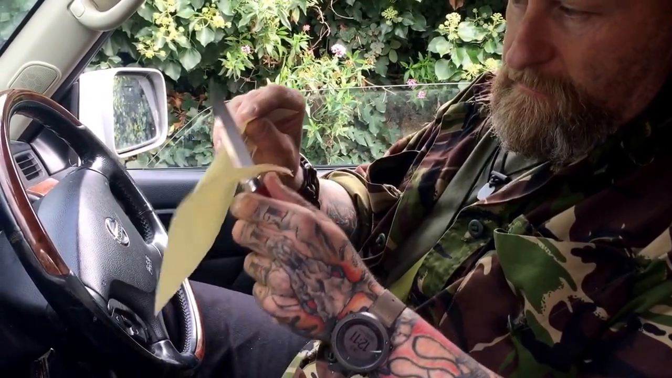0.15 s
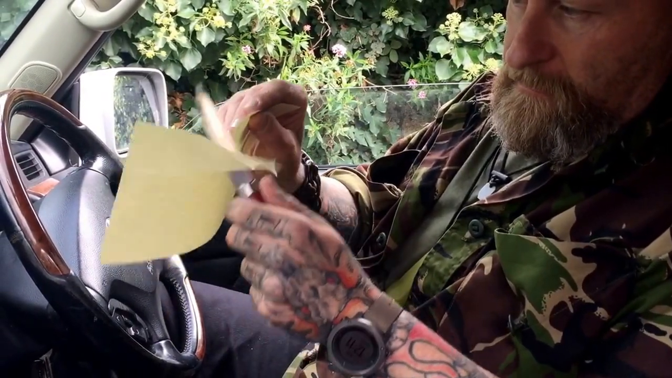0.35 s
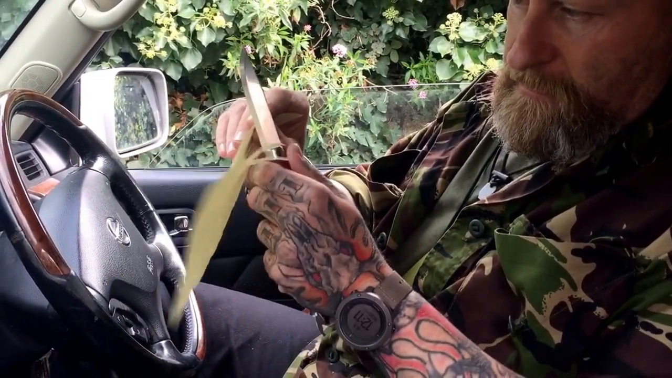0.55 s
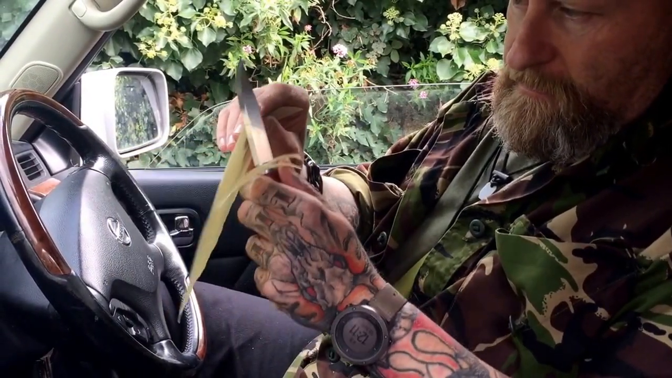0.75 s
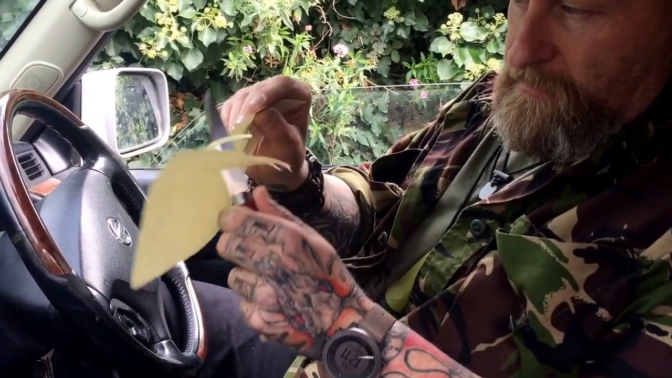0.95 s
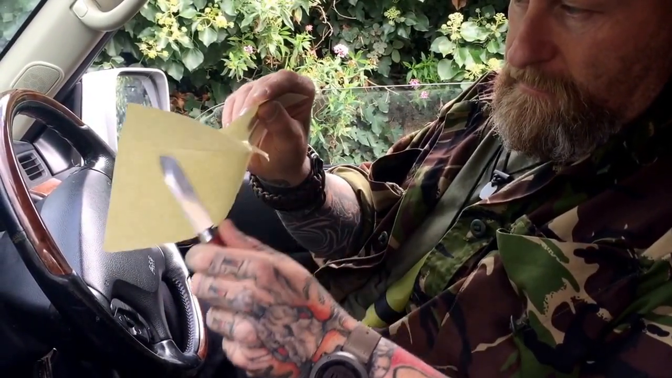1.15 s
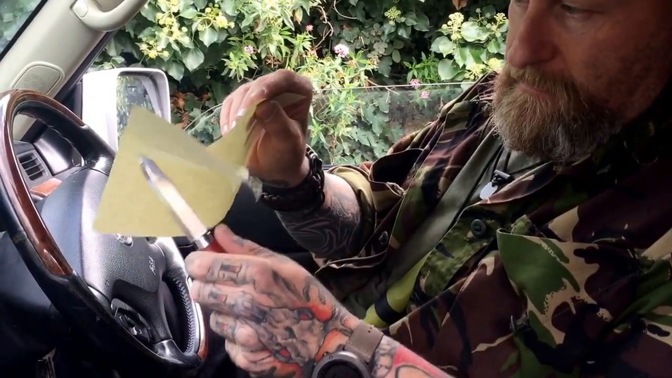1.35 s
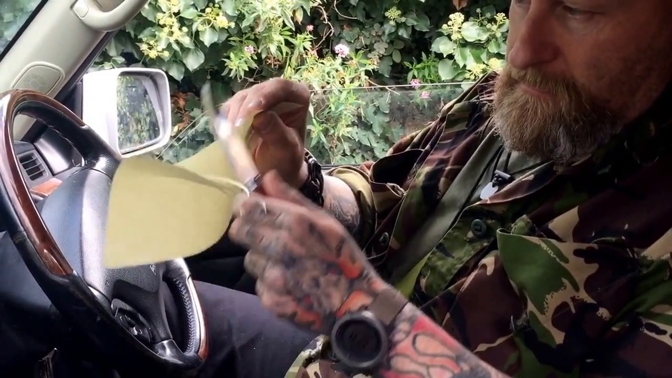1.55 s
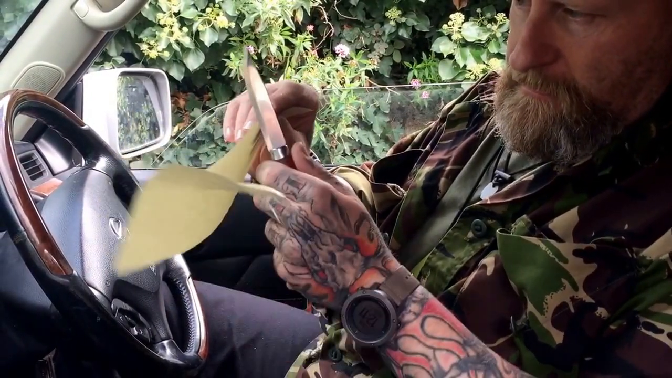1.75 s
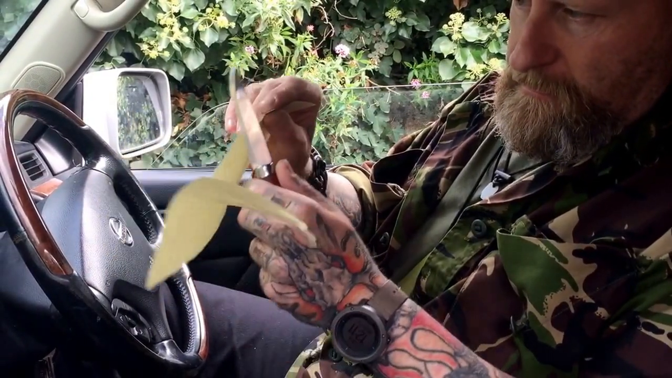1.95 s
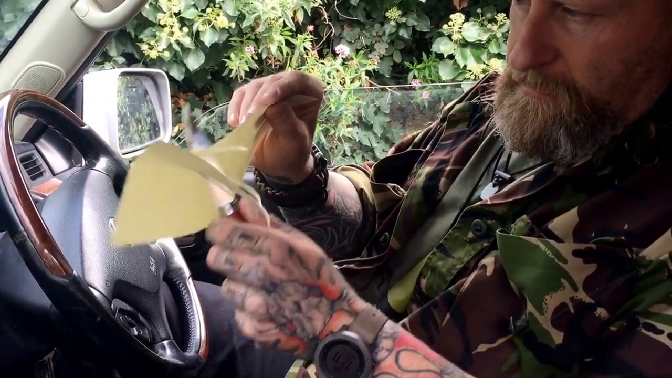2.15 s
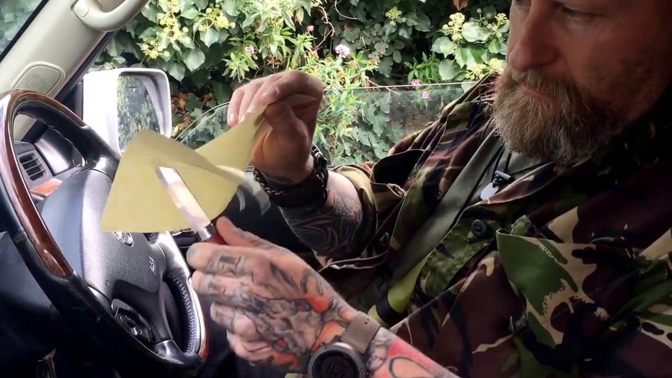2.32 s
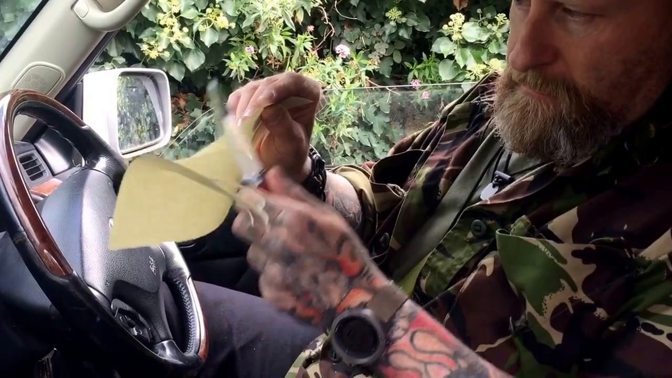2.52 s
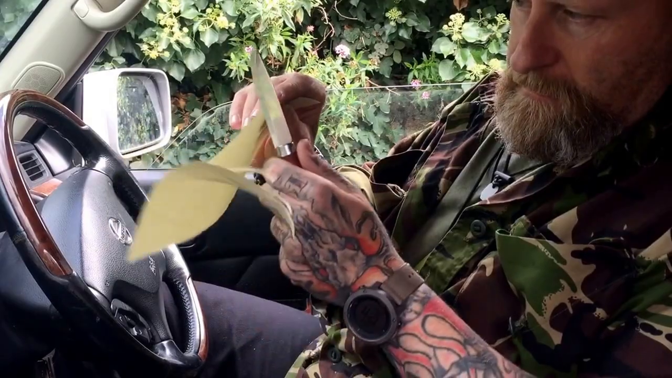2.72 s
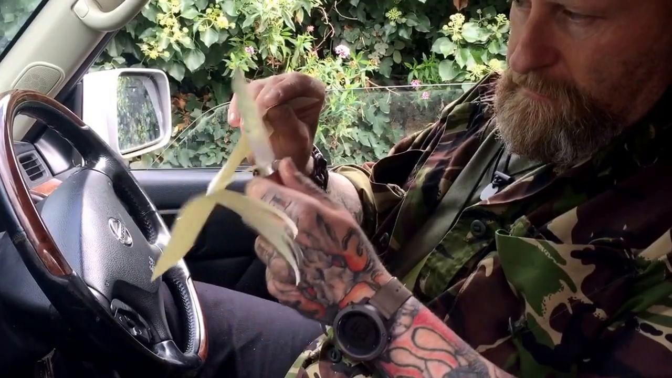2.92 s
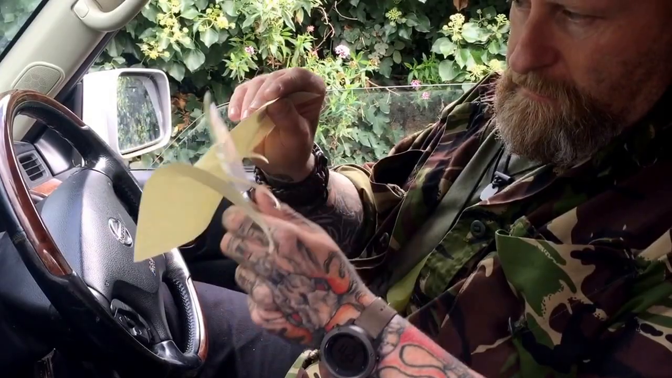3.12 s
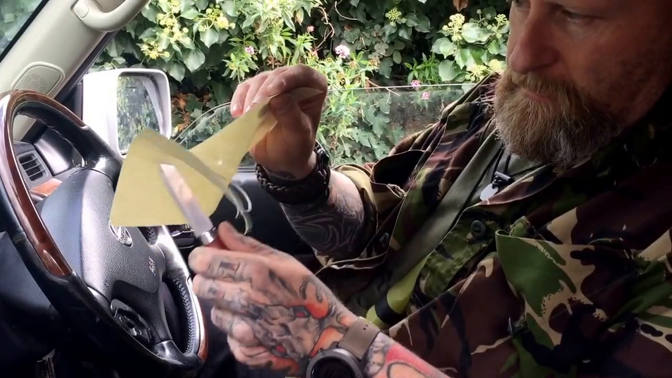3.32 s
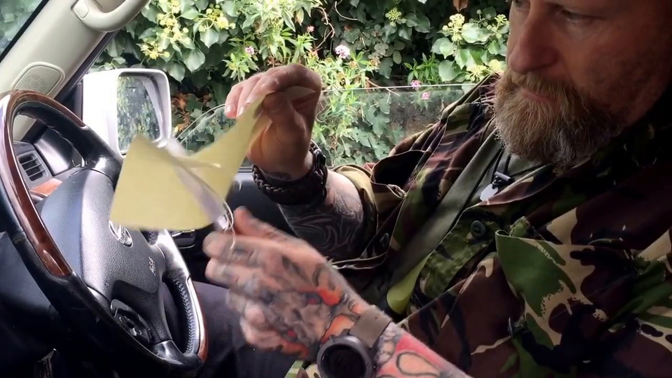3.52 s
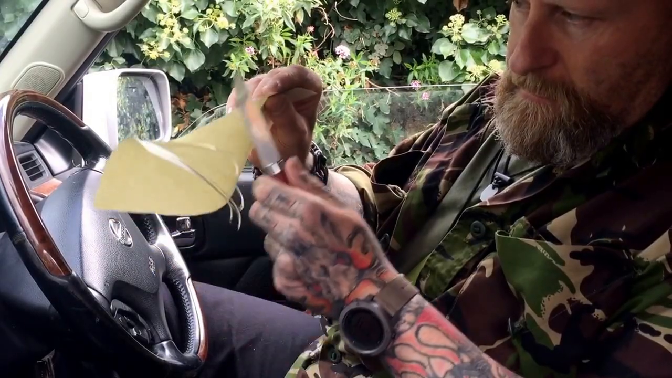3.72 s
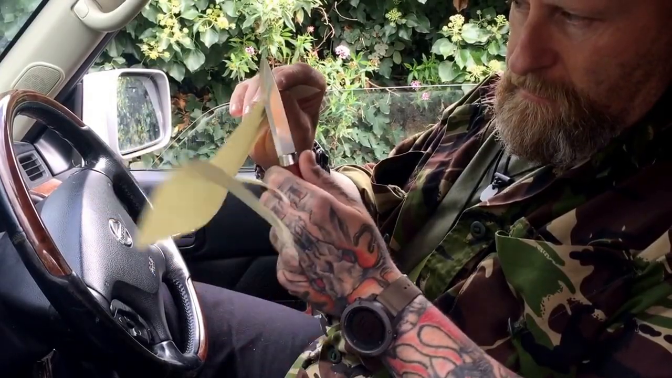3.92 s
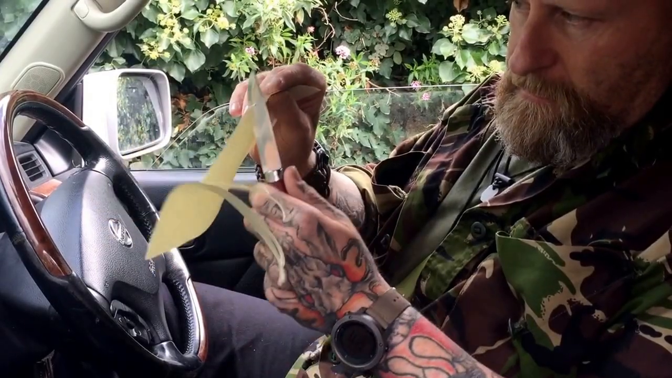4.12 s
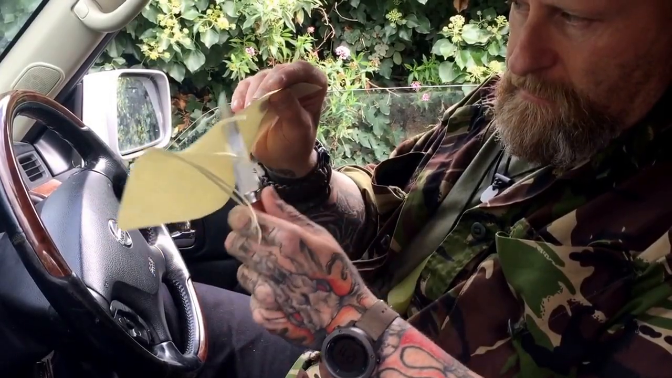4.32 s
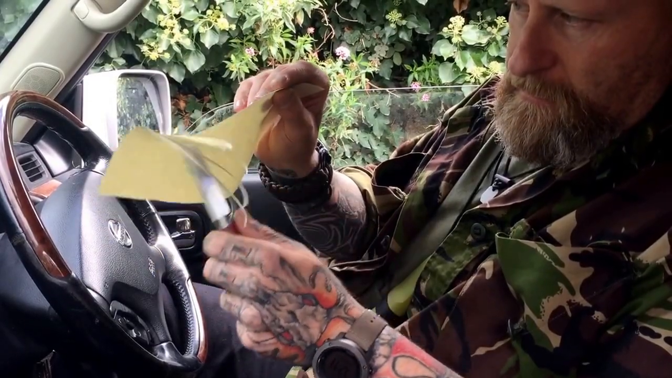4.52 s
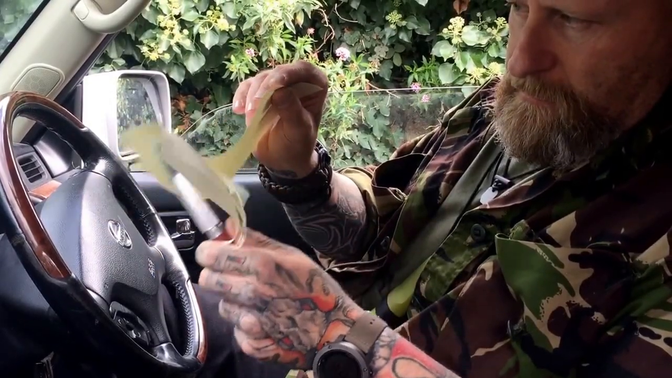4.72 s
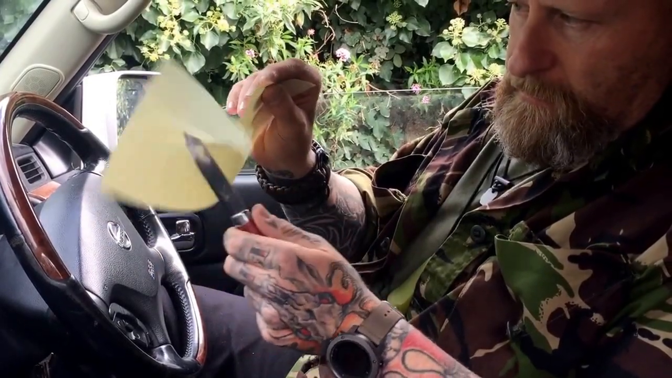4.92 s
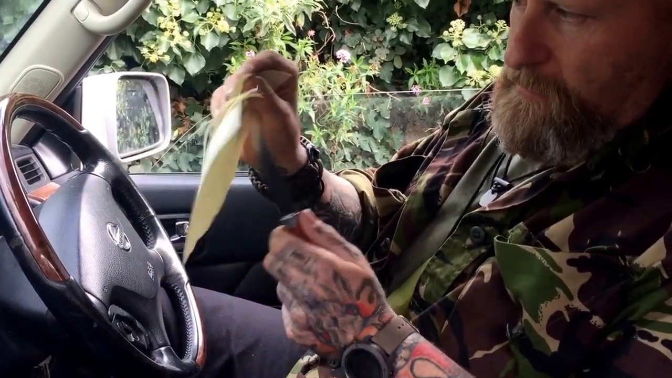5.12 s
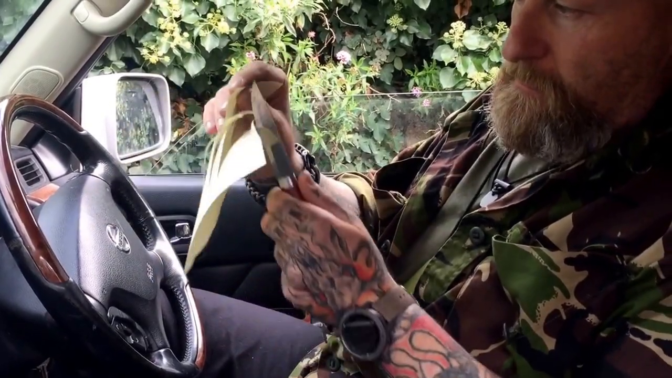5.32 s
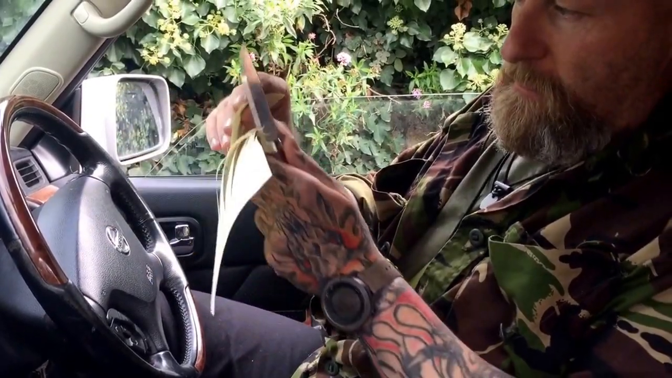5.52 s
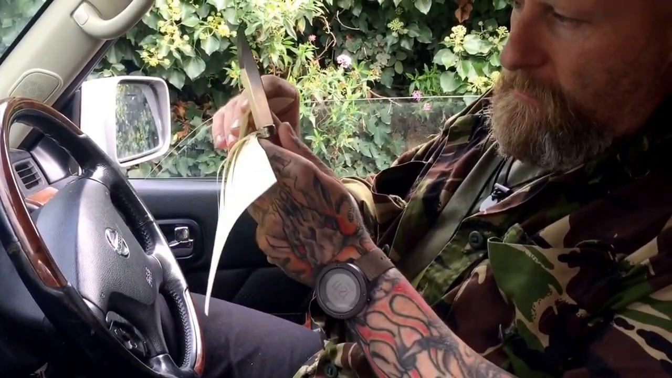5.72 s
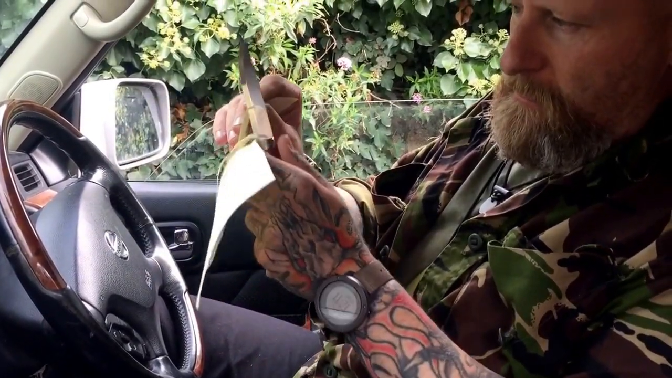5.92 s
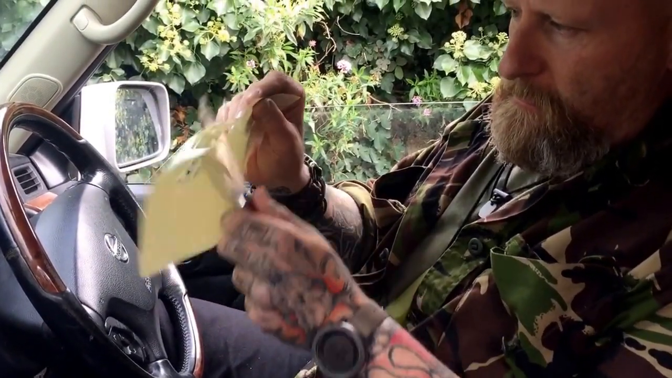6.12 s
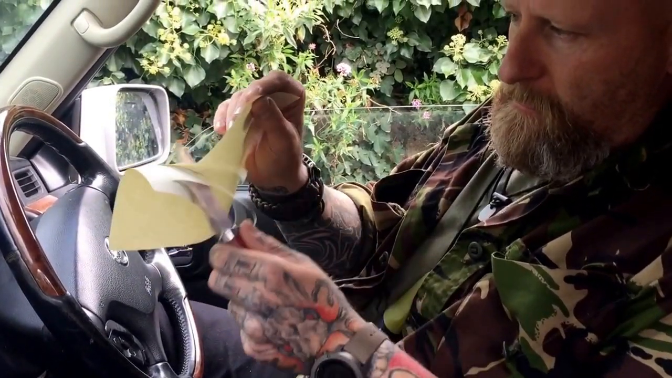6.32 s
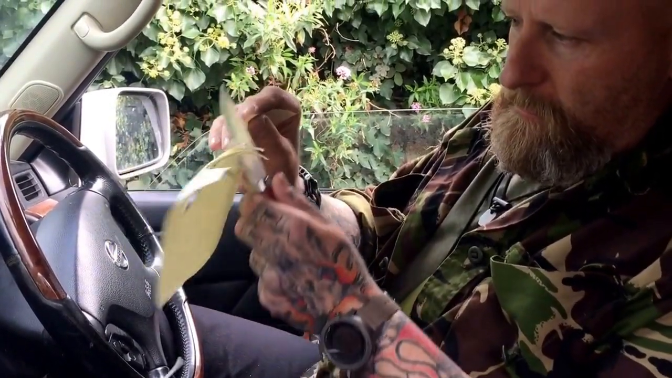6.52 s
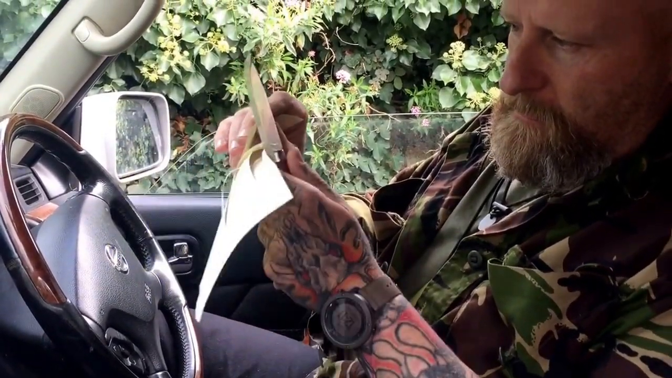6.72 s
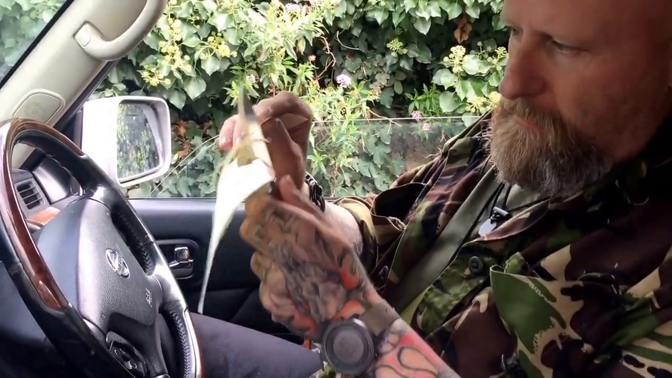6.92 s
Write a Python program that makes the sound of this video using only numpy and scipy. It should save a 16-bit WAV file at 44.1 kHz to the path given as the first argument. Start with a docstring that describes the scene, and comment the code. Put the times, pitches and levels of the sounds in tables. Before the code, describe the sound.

A sharp knife slices strips from a sheet of paper in hissing, rasping strokes, with small crackles between, inside a parked car.

```python
"""Inside a parked car, a sharp knife shaves strips off a hand-held sheet of paper.
Each cut starts as a thin hiss of snapping fibres and swells to a rasp as the sheet pulls taut and radiates.
Between cuts the blade grazes the edge and the loose sheet cracks, ticks, rustles and flops.
A faint, soft puff comes just before the first cut.
The small cabin colours all the paper but the flops; faint outdoor air comes through the shut doors."""
import sys
import numpy as np
from scipy import signal
from scipy.io import wavfile
from scipy.ndimage import uniform_filter1d, map_coordinates

SR = 44100
rng = np.random.default_rng(int(sys.argv[2]) if len(sys.argv) > 2 else 0)


def persist_wave(psi):
    """Save psi, clipped to +-1, as 16-bit WAV."""
    counts = np.round(np.clip(psi, -1, 1) * 32767).astype(np.int16)
    wavfile.write(sys.argv[1], SR, np.atleast_2d(counts).T)


N = 306936
TIME = np.arange(N) / SR
BINS = np.fft.rfftfreq(4096, 1 / SR)


def cutting():
    """Breaking fibres hiss at the edge, scrape along the blade and shake the sheet."""
    # cuts right through: start/s, taut/s, end/s, attack/s, first hiss/dB, full hiss/dB, bite/dB,
    # scrape swell/dB, slack rasp over hiss/dB, taut rasp over hiss/dB
    cuts = [ (0.656, 1.01, 1.307, .036, -46.5, -37, 3.5, -0.5, -12.5, -0.5),
            (1.793, 2.157, 2.3335, 0.079, -48, -36.5, 0.5, 2, -9.5, 0.5),
            (2.911, 3.22, 3.407, .025, -45.5, -36.5, 7.5, 5.5, -7, 1),
            (4.095, 4.437, 4.656, 0.025, -44.5, -38, -1.5, 7, -6, 0.5), ]
    # light strokes on the edge: start/s, crest/s, end/s, hiss/dB, swell/dB, fade/dB,
    # then against the hiss: scrape/dB, rasp/dB, shudder/dB
    grazes = [ (-0.008, 0.046, 0.13, -42, 1.5, 5.5, 1.5, -22, -27.5),
              (1.577, 1.64, 1.667, -35, 11.5, 11.5, 1, -17, -27),
              (2.742, 2.818, 2.814, -50.5, 12, -0.5, 1.5, -0.5, -5),
              (2.85, 2.883, 2.895, -63, 1, 4, 11.5, 6.5, -15),
              (3.742, 3.762, 3.77, -53.5, -14, -2, 0, -25, -17),
              (4.748, 4.773, 4.785, -50.5, 7, 10.5, -2, -5, -14),
              (4.823, 4.96, 4.962, -49.5, 5.5, 4.5, -2.5, -13, -21),
              (5.845, 6.124, 6.198, -39.5, 16.5, 6.5, 1, -11, -27.5),
              (6.215, 6.25, 6.3, -57.5, -8, 15, 7.5, 0.5, -21.5),
              (6.283, 6.313, 6.309, -56.5, 2, 8, 9, -3, -20),
              (6.791, 6.913, 7.05, -44.5, 5.5, -2, 0, -11, -27), ]
    # spectra of edge hiss, blade scrape, sheet rasp and the sheet's slow flexing: f/Hz, level/dB
    hiss_eq = [(1100, -44), (1600, -10), (2200, -6), (3000, -22), (4800, 2.5), (6200, 0), (8500, -2),
               (9600, -1.5), (10400, -8.5), (11300, -4), (13500, -7.5), (16000, -12.5)]
    scrape_eq = [(900, -34), (2000, -16.5), (2800, -7), (3600, 0), (4200, 3.5), (4800, -1.5), (5600, -13),
                 (9000, -23)]
    rasp_eq = [(60, -27.5), (170, -47.5), (270, -15.5), (500, -6), (650, -24), (850, -6.5), (1200, 1),
               (1600, -0.5), (2300, -0.5), (3000, -8), (5000, -2.5), (10000, -20)]
    flex_eq = [(50, -17.5), (120, -10), (175, 1), (260, -8), (350, 1.5), (430, 2), (520, 4), (700, -6),
               (1200, -42.5)]
    strokes = [cut_levels(*row) for row in cuts] + [graze_levels(*row) for row in grazes]
    hiss, scrape, rasp, shudder = amp(np.max(strokes, axis=0))
    grain = amp(0.4 * wander(60) + 0.55 * wander(350))  # the paper is uneven
    fibres = snaps(per_s=6000, spread_db=3.5, smooth=0.4) * grain
    near_edge = snaps(per_s=6000, spread_db=-1.5, smooth=0.24) * grain
    drag = snaps(per_s=4000, spread_db=3.0, smooth=0.74) * grain
    pressure = amp(wander(18))  # the blade leans on the paper unevenly
    cut = (hiss * colour(near_edge, hiss_eq)
           + scrape * pressure * colour(drag, scrape_eq)
           + rasp * colour(fibres, rasp_eq)
           + shudder * colour(fibres, flex_eq))
    return bending(cut, depth_db=3, spacing_hz=202.2, hold_s=0.07)


def cut_levels(start, taut_at, end, attack, first_db, full_db, bite_db, bind_db, slack_db, taut_db):
    """The blade bites, the force builds and the sheet pulls taut: hiss, scrape, rasp and shudder in dB."""
    t, length, since_taut = TIME - start, end - start, TIME - taut_at
    build = np.interp(t / length, [0.087, 0.75], [0, 1])
    force = np.sin(np.pi / 2 * build) ** 2
    bite = bite_db * np.exp(-np.maximum(t - attack, 0) / 0.056)  # extra force to enter the edge
    ease = 2.5 * np.exp(np.minimum(t - length, 0) / 0.013)  # the hand eases off near the far edge
    hiss = first_db + (full_db - first_db) * force + bite - ease + gate(t, attack, length)
    taut = step(since_taut / 0.022)
    binding = np.exp(-((since_taut + 0.053) / 0.13) ** 2)  # hardest just before the sheet is taut
    still = step((0.015 - since_taut) / 0.059)  # once taut, the sheet shudders as a whole
    scrape = hiss - 1.5 + bind_db * binding - 1.5 * taut
    rasp = hiss + slack_db + (taut_db - slack_db) * taut
    shudder = hiss - 10 - 17.5 * still + bite
    return [hiss, scrape, rasp, shudder]


def graze_levels(start, crest, end, db, swell_db, fade_db, scrape_db, rasp_db, shudder_db):
    """A light stroke swells and fades while the sheet stays slack: the same four levels."""
    swell = swell_db * np.interp(TIME, [start, crest], [1, 0]) ** 1.68  # flattens towards the crest
    fade = fade_db * np.interp(TIME, [crest, end], [0, 1])
    hiss = db - swell - fade + gate(TIME - start, attack=0.022, length=end - start)
    thinness = np.interp(TIME, [start, end], [1, 0])  # scrape and body fill in along the stroke
    body = hiss - 9 * thinness
    return [hiss, hiss + scrape_db - 6 * thinness, body + rasp_db, body + shudder_db]


def snaps(per_s, spread_db, smooth):
    """Fibres breaking at random with uneven force, over a share of smooth friction."""
    size = amp(spread_db * np.minimum(rng.exponential(1, N), 4))
    clicks = size * rng.choice([-1., 1.], N) * (rng.random(N) < per_s / SR)
    return unit(unit(clicks) + smooth * rng.standard_normal(N))


def bending(x, depth_db, spacing_hz, hold_s):
    """As the sheet bends and the cut lengthens, its resonances shift; the power stays the same."""
    hz, t, flat = signal.stft(x, SR, nperseg=512, noverlap=384)
    shapes = rng.standard_normal((400, 400))
    grid = np.meshgrid(hz / spacing_hz, t / hold_s, indexing="ij")
    resonances = map_coordinates(shapes, grid, order=1, mode="mirror")
    bent = flat * amp(depth_db * unit(resonances))
    before, after = (uniform_filter1d((abs(v) ** 2).sum(0), size=5) for v in (flat, bent))
    bent *= np.sqrt((abs(before) + 1e-16) / (abs(after) + 1e-16))
    return signal.istft(bent, SR, nperseg=512, noverlap=384)[1][:N]


def cracks_and_puff():
    """Short, papery cracks as the sheet buckles, and one faint, soft puff of mid-range noise."""
    # papery cracks, with the puff at 0.52 s: t/s, level/dB, tilt/(dB per octave), decay/s
    bursts = [(0.2592, -30, 4, 0.013), (0.518, -53.5, -3, 0.052), (1.867, -40, -5.5, 0.007),
              (2.9, -27.5, 2, 0.006), (3.4645, -34, 2.5, 0.0063), (4.0335, -32, 1, 0.0081),
              (4.736, -37.5, 4.5, 0.018), (6.147, -39.5, -2, 0.0081), (6.6172, -49.5, -3.5, 0.0089)]
    # spectrum they share before the tilt: f/Hz, level/dB
    burst_eq = [(50, -29), (170, -12), (300, -6.5), (470, 1.5), (620, -11), (900, -1.5), (1700, 2),
                (2600, -7), (3800, -3.5), (6000, -13.5), (8000, -25.5), (16000, -43)]
    out = np.zeros(N)
    for s, db, tilt, decay in bursts:
        tone_db = read(burst_eq, BINS) + tilt * np.log2((BINS + 200) / 1500) + 2.8 * ripple(314)
        burst = noise_burst(decay, rise=0.18 * decay)
        add(out, s, amp(db) * signal.fftconvolve(burst, response(tone_db)))
    return out


def ticks(skirt_db=6, ring_db=3.5):
    """Small creases give way, each ringing its own few modes under a hump of treble."""
    # creases in the loose sheet: t/s, level/dB, centre f/Hz
    creases = [(0.297, -46, 3000), (0.3133, -47.5, 3800), (0.3534, -51, 4070), (0.4116, -56, 3860),
               (1.527, -59.5, 4940), (2.5342, -60, 5000), (2.556, -59, 4500), (2.5818, -53.5, 4000),
               (2.7674, -49.5, 4000), (3.664, -55.5, 4930), (3.7115, -56, 5000), (3.753, -47.5, 4740),
               (4.715, -50, 4440), (4.8056, -48, 4000), (5.026, -55.5, 5800), (5.077, -54, 6040),
               (5.2569, -47, 4100), (5.32, -53.5, 4900), (5.721, -63.5, 4950), (6.2364, -43, 4860),
               (6.3511, -56, 3900), (6.496, -44, 4270)]
    damping_db = -4 * (BINS / 11000) ** 2  # paper soaks up the highest modes
    out = np.zeros(N)
    for s, db, hz in creases:
        fractures = noise_burst(decay=0.0084, rise=0.00039)
        hump_db = np.maximum(-skirt_db * np.log2((BINS + 100) / hz) ** 2, -28)
        ring = response(hump_db + damping_db + ring_db * ripple(326))
        add(out, s, amp(db) * signal.fftconvolve(fractures, ring))
    return out


def noise_burst(decay, rise):
    """A burst of noise that builds quickly and dies away."""
    t = TIME[:4096]
    return rng.standard_normal(len(t)) * (1 - np.exp(-t / rise)) * np.exp(-t / decay)


def ripple(spacing_hz):
    """Random peaks and dips over frequency give each burst its own resonances."""
    return np.interp(BINS / spacing_hz, np.arange(512), rng.standard_normal(512))


def flops(glide_s=0.026, rise_s=0.0059):
    """A bending wave runs down the sheet: short ripples arrive first, so the rough thud falls in pitch."""
    # thuds of the hanging sheet: t/s, level/dB, first f/Hz, last f/Hz, decay/s
    thuds = [(.519, -38, 202, 147, 0.012), (0.548, -49.5, 91, 55.6, 0.086), (4.739, -38, 189, 158, 0.01)]
    out, t = np.zeros(N), TIME[:SR // 2]
    for s, db, first_hz, last_hz, decay in thuds:
        hz = last_hz + (first_hz - last_hz) * np.exp(-t / glide_s)
        flutter = 1 + 0.6 * (wander(first_hz) + 1j * wander(first_hz))[:len(t)]
        wave = (flutter * np.exp(2j * np.pi * np.cumsum(hz) / SR)).imag
        add(out, s, amp(db) * (1 - np.exp(-t / rise_s)) * np.exp(-t / decay) * wave)
    return out


def rustle(attack_s=0.034, floor_db=-73.5):
    """Soft crinkles where the fingers hold the sheet, which never goes quite silent."""
    # the fingers shift their grip: t/s, length/s, level/dB, fade/dB
    grips = [(0.13, .095, -57, 4.5), (0.224, 0.12, -48, 17), (2.528, 0.15, -72, -3), (3.602, 0.26, -69, -3),
             (3.969, 0.084, -60.5, -8.5), (4.015, 0.078, -44.5, 8), (4.714, 0.32, -64, 16),
             (5.065, 0.028, -57, 2), (5.313, .36, -63.5, 4), (6.445, 0.25, -65, 1)]
    # spectrum of the crinkles: f/Hz, level/dB
    crinkle_eq = [(300, -16), (1200, -4), (2500, -7), (4000, 1.5), (7000, -1.5), (10000, -7), (16000, -14)]
    crinkles = snaps(per_s=900, spread_db=3, smooth=1) * amp(2 * wander(40))
    shifts = [db - fade_db * np.clip((TIME - s) / length, 0, 1) + gate(TIME - s, attack_s, length)
              for s, length, db, fade_db in grips]
    level_db = np.maximum(np.max(shifts, axis=0), floor_db)
    return amp(level_db) * colour(crinkles, crinkle_eq)


def cabin(x, echoes_per_s=4000, predelay_s=0.0015):
    """Close glass gives fixed resonances; seats and lining soak up the tail quickly."""
    # resonances between glass and dashboard: f/Hz, width/Hz, lift/dB
    modes = [(875, 61, 7), (1000, 51, 9), (1110, 100, 2.5), (1359, 30, 5.5), (1549, 102, 9), (1705, 47, 8),
             (1700, 90, 0), (2172, 210, 6.5), (2270, 33, -9.5), (2201, 49, -5), (2384, 116, 4),
             (2640, 64, -2.5), (2692, 55, 9.5), (3024, 230, 3), (3420, 130, -2), (3560, 110, 0.5),
             (4004, 59, -9), (4000, 38, 1), (4944, 610, -5), (5100, 100, -1.5), (6200, 110, 4),
             (6640, 72, -0.5), (7990, 59, -2)]
    # reverb time of the cabin: f/Hz, t60/s
    decays = [(150, 0.55), (530, 0.12), (1400, 0.06), (3700, 0.043), (9700, 0.017)]
    lift_db = sum(db / (1 + (2 * (BINS - hz) / width) ** 2) for hz, width, db in modes)
    count = SR // 4
    echoes = rng.choice([-1., 1.], count) * (rng.random(count) < echoes_per_s / SR)
    echoes *= TIME[:count] > predelay_s
    hz, t, bands = signal.stft(echoes, SR, nperseg=128)
    bands *= amp(-60 * t / read(decays, hz)[:, None])
    tail = signal.istft(bands, SR, nperseg=128)[1]
    tail *= amp(-6) / np.linalg.norm(tail)
    tail = signal.lfilter(*signal.butter(1, 2500, "high", fs=SR), tail)  # scatter is mostly treble
    tail[0] += 1  # direct sound
    room = signal.fftconvolve(tail / np.linalg.norm(tail), response(lift_db))
    return signal.oaconvolve(x, room)[:N]


def air():
    """A faint outdoor wash with a wavering low rumble."""
    # outdoor air through the shut doors: f/Hz, level/dB
    air_eq = [(12, -60), (20, 10), (107, -4), (172, -3), (542, -14.5), (678, -15), (1000, -12.5),
              (1190, -12.5), (1860, -14.5), (2140, -17.5), (2910, -19), (3530, -19.5), (5080, -29),
              (6010, -31.5), (16000, -31)]
    wash = colour(rng.standard_normal(N), air_eq) * amp(0.68 * wander(3.4))
    phase = 2 * np.pi * 51 * TIME + 2.0 * wander(6.6)
    rumble = unit(np.sin(phase) * amp(2.5 * wander(18)))
    low_cut = signal.butter(4, 36, "high", fs=SR, output="sos")
    return signal.sosfilt(low_cut, amp(-67.5) * wash + amp(-74.5) * rumble)


def gate(t, attack, length, depth_db=26, release_s=0.036):
    """Attack, hold and release of a stroke, in dB."""
    return -depth_db * (np.maximum(1 - t / attack, 0) ** 2 + np.maximum(t - length, 0) / release_s)


def step(x):
    """A soft step from 0 to 1 around x = 0."""
    return 0.5 + 0.5 * np.tanh(x)


def wander(rate_hz):
    """Random drift of about rms 1."""
    knots = rng.standard_normal(N // 20)
    return np.interp(TIME * rate_hz, np.arange(len(knots)), knots) * np.sqrt(3 / 2)


def colour(x, eq):
    """Shapes x with an EQ curve, at rms 1."""
    return unit(signal.oaconvolve(x, response(read(eq, BINS)))[:len(x)])


def response(curve_db):
    """Causal impulse response of energy 1 with the given spectrum."""
    log_gain = np.log(amp(np.r_[curve_db, curve_db[-2:0:-1]]))
    minimum_phase = np.exp(np.conj(signal.hilbert(log_gain)))
    taps = np.fft.ifft(minimum_phase).real[:len(BINS)]
    return taps / np.linalg.norm(taps)


def read(points, hz):
    """Reads a table on a log-frequency axis."""
    f, value = np.transpose(points)
    return np.interp(np.log(hz + 1), np.log(f + 1), value)


def add(mix, s, sound):
    """Mixes a sound in at time s."""
    part = mix[max(round(s * SR), 0):][:len(sound)]
    part += sound[:len(part)]


def amp(db):
    """Decibels to gain."""
    return 10 ** (np.asarray(db) / 20)


def unit(x):
    """Scales to rms 1."""
    return x / np.sqrt(np.mean(x ** 2) + 1e-20)


def scene():
    """Knife and paper in the cabin, with dry flops and a bed of air, all in mono."""
    mono = cabin(cutting() + cracks_and_puff() + ticks() + rustle()) + flops() + air()
    return np.array([mono, mono])


def record(dry, cutoff_hz=15900):
    """A steep low-pass trims the very top."""
    low_pass = signal.firwin(511, cutoff_hz, window=("kaiser", 9), fs=SR)
    return signal.oaconvolve(dry, low_pass[None], "same")


dry = scene()
out = record(dry)
persist_wave(out)
```